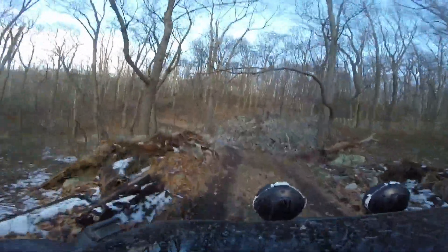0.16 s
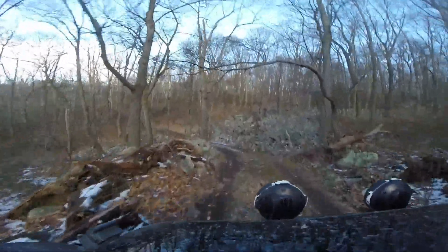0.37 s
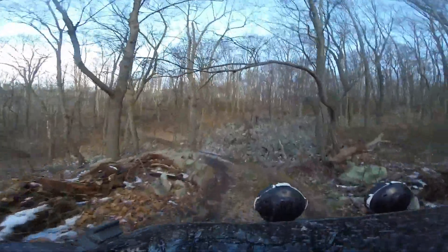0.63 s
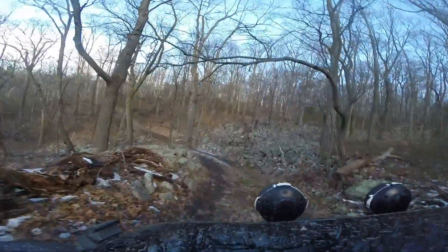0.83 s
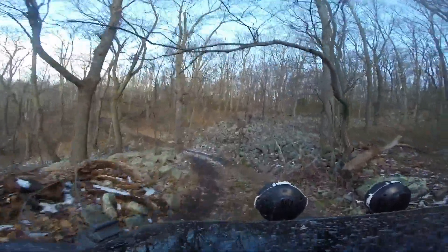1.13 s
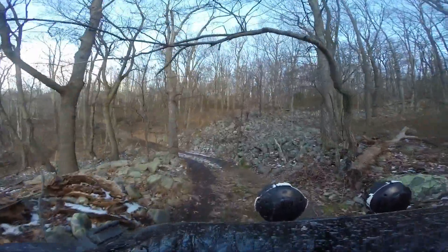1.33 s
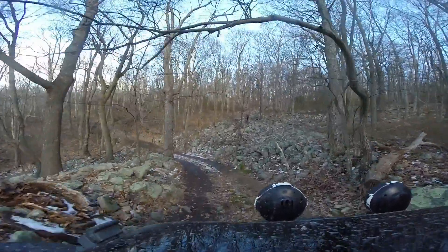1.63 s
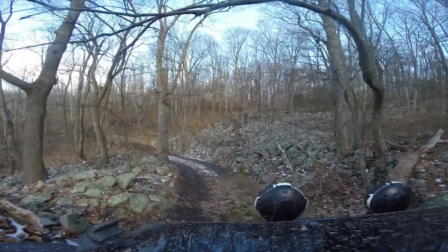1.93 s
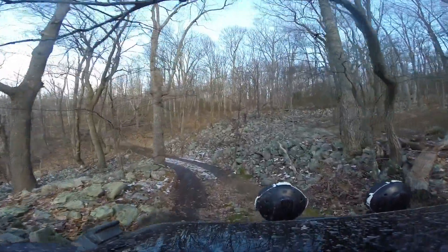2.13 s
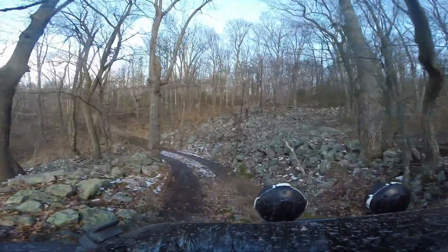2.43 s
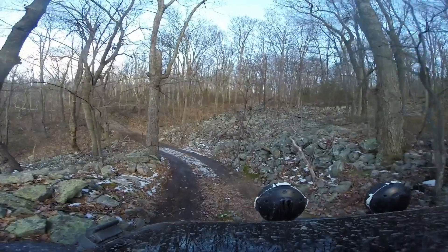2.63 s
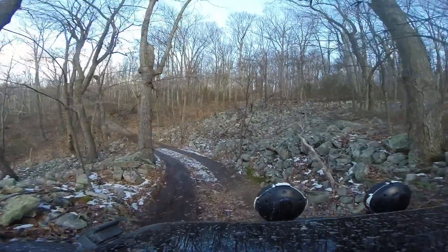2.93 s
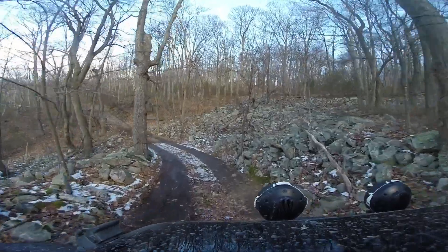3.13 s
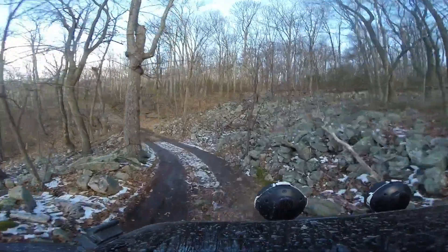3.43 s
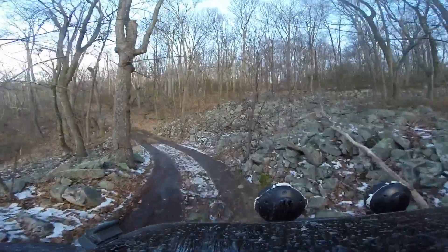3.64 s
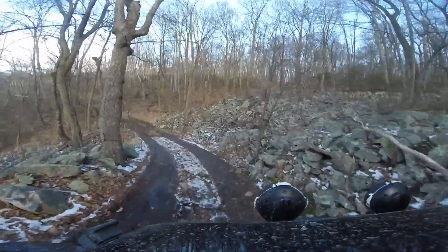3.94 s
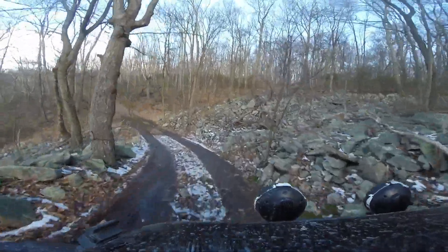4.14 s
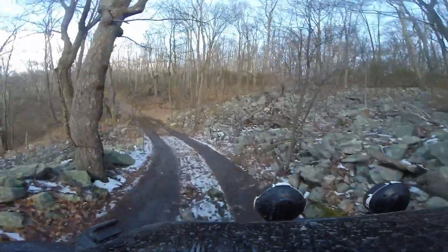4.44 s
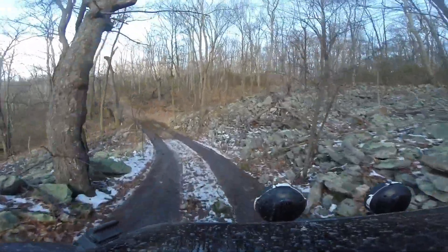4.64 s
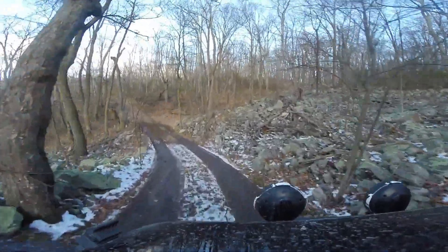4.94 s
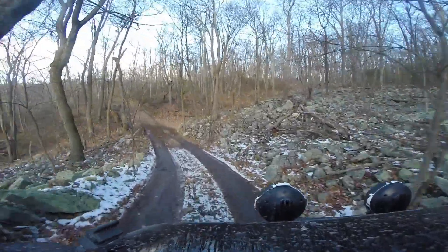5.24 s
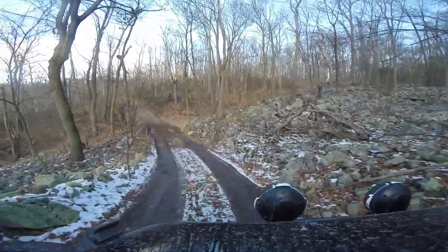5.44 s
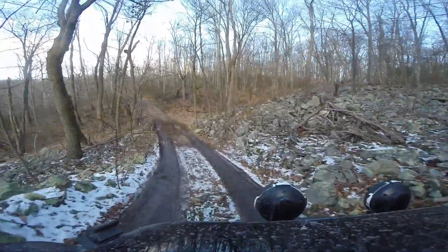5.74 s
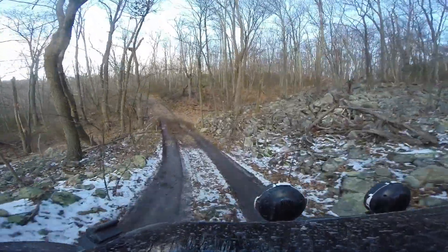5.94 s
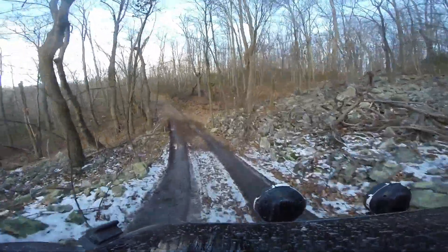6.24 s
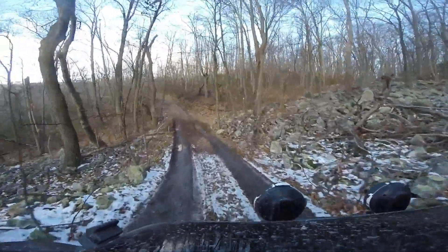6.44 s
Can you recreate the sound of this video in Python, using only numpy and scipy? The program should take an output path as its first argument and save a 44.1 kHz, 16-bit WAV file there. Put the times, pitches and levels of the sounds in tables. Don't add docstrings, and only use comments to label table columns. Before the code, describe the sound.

A low, boomy engine inside a vehicle cab, close and dry. First rough ground: axle thumps, knocking stones, twig scrapes and a loose fitting clattering rapidly. The ride calms, the engine swells and holds for over a second, then falls back. Rattling resumes in quick regular ticks, strongest around four and a half seconds, over muffled tyre crunch, floor thuds and faint leaf crackle to the end.

```python
import sys
import numpy as np
from scipy import signal
from scipy.io import wavfile

SR = 44100
rng = np.random.default_rng(int(sys.argv[2]) if len(sys.argv) > 2 else 0)


def invert_db(level):
    return 10 ** (np.asarray(level, dtype=float) / 20)


def wav_record(signal):
    frames = np.transpose(np.atleast_2d(signal))
    bounded = np.clip(frames, -1, 1)
    quanta = np.round(bounded * 32767).astype(np.int16)
    wavfile.write(sys.argv[1], SR, quanta)


N = 290178


def rms_one(x):
    return x / np.sqrt(np.mean(x ** 2) + 1e-20)


def in_time(rows):
    s, *columns = np.transpose(rows)
    return [np.interp(np.arange(N) / SR, s, column) for column in columns]


def drift(rate_hz):
    pole = np.exp(-80 * np.pi * rate_hz / SR)
    slow = signal.lfilter([1], [1, -2 * pole, pole * pole], rng.standard_normal(N // 40 + 2002))
    slow = slow[2000:]
    return np.interp(np.arange(N) / 40, np.arange(len(slow)), rms_one(slow))


def resonate(x, hz, width_hz):
    pole = np.exp(-np.pi * width_hz / SR)
    zeros = (1 - pole * pole) / 2 * np.array([1, 0, -1])
    poles = [1, -2 * pole * np.cos(2 * np.pi * hz / SR), pole * pole]
    return signal.lfilter(zeros, poles, x + 1e-18)


def resonate_twice(x, hz, width_hz, second_width_hz):
    return rms_one(resonate(resonate(x, hz, width_hz), hz, second_width_hz))


def filtered(x, order, hz, kind="low"):
    return signal.sosfilt(signal.butter(order, hz, kind, fs=SR, output="sos"), x)


def bank(source, spectrum, patchy_db, patch_rate):
    hz, db = np.transpose(spectrum)
    octaves = np.log2(min(hz[-1], SR * .44) / hz[0])
    edges = hz[0] * 2 ** np.arange(0, octaves, 1 / 3)
    out = 0
    for k, (low, high) in enumerate(zip(edges, edges[1:])):
        band = filtered(source[k % 2], 2, [low, high], "band")
        band_db = np.interp(np.log(low * high) / 2, np.log(hz), db)
        out = out + band * invert_db(band_db + patchy_db * drift(patch_rate))
    return rms_one(out)


def grains(per_s, spread_db, hiss):
    size = invert_db(spread_db * np.minimum(rng.exponential(1, (2, N)), 5)) * rng.standard_normal((2, N))
    clicks = size * (rng.random((2, N)) < per_s / SR)
    return rms_one(clicks) + hiss * rng.standard_normal((2, N))


def add_at(out, s, sound):
    at = round(s * SR)
    out[at:at + len(sound)] += sound[:N - at]


def exhaust(hz, turns, load_db):
    # multiple of the firing rate, level in dB.
    orders = [(.5, -38), (1, -24), (2, -30), (3, -32), (4, -32), (5, -39), (6, -41), (7, -56)]
    # frequency in Hz, width in Hz, gain in dB.
    cab_modes = [(118.1, 22.4, 20), (183.5, 14, -0.5), (290, 32, 9.5), (361, 11, 3)]
    out = 0
    for order, db in orders:
        boom = 1
        for mode_hz, width_hz, top_db in cab_modes:
            detuning = 2 * (order * hz - mode_hz) / width_hz
            boom = boom + invert_db(top_db) / np.sqrt(1 + detuning ** 6)
        wobble = invert_db(db + (.4 + .2 * order) * drift(5.0))
        phase = 2 * np.pi * (order * turns + rng.random()) + .04 * order * drift(8.0)
        out = out + boom * wobble * np.sin(phase)
    return np.sqrt(2) * out * invert_db(load_db)


def clatter(turns, level_db):
    # frequency in Hz, level in dB per Hz.
    spectrum = [(1100, -0.5), (1500, -4), (2000, -4.5), (2500, -5), (3300, -10.5), (4200, -13), (5000, -23),
                (5800, -22), (7800, -36), (9000, -47), (11500, -41.5), (13000, -58)]
    # frequency in Hz, width in Hz, level in dB.
    casing = [(1655, 230, -7.5), (2332, 130, -11), (4980, 270, -20), (7720, 1400, -21.5),
              (11200, 2400, -26.5)]
    source = grains(per_s=1800.0, spread_db=-1.0, hiss=3.0)
    noise = bank(source, spectrum, patchy_db=1.56, patch_rate=12.0)
    white = rng.standard_normal(N)
    for hz, width_hz, db in casing:
        noise = noise + invert_db(db) * resonate_twice(white, hz, width_hz, width_hz)
    return invert_db(level_db) * rms_one(noise * (1 + 0.14 * np.cos(2 * np.pi * turns)))


def body(shake_db, thud_db):
    # frequency in Hz, width in Hz, level in dB.
    modes = [(17.4, 4.5, 1.5), (36.2, 14.9, 2), (55.6, 18, -6.5)]
    # frequency in Hz, level in dB per Hz.
    spectrum = [(45, -33), (65, -15.5), (92, -5.5), (122, 2), (160, -5), (220, -12), (300, -8.5)]
    white = rng.standard_normal((3, N))
    shake = sum(invert_db(db) * resonate_twice(white[2], hz, width_hz, 2.3 * width_hz)
                for hz, width_hz, db in modes)
    lumps = invert_db(thud_db + 1.77 * drift(11.0))
    thud = lumps * bank(white, spectrum, patchy_db=0.8, patch_rate=13.0)
    return invert_db(shake_db) * rms_one(shake) + thud


def tyres(crunch_db):
    # frequency in Hz, level in dB per Hz.
    spectrum = [(120, -18.5), (200, -0.5), (320, -2.5), (460, -0.5), (620, -5), (800, -3.5), (1050, -12.5),
                (1300, -20), (1700, -28.5)]
    lumps = invert_db(crunch_db + 0.64 * drift(38.0) + 0.61 * drift(10.3))
    source = grains(per_s=900.0, spread_db=0.5, hiss=1.24)
    grit = bank(source, spectrum, patchy_db=1.5, patch_rate=17.4)
    grit = grit + 0.51 * resonate(grit, 1014.0, 96.0)
    return lumps * filtered(grit, 6, 1120.0)


def leaves():
    # frequency in Hz, level in dB per Hz.
    spectrum = [(4000, -20), (6000, 0), (8000, -9.5), (11500, -11.5), (13500, -12), (15000, -19),
                (16000, -30)]
    # middle in seconds, length in seconds, extra level in dB.
    drifts = [
        (0.05, .3, 4),
        (1.013, 0.16, 2.5),
        (2.702, 0.69, 1.5),
        (3.65, 0.27, 1.5),
        (4.36, 0.12, -1),
        (4.967, .4, 2.5),
        (5.857, 0.65, 7.5),
        (6.555, 0.28, 3),
    ]
    t = np.arange(N) / SR
    litter_db = -68.5
    depth_db = litter_db + sum(db * np.exp(-(2 * (t - s) / length) ** 2) for s, length, db in drifts)
    clumps = invert_db(depth_db - 2.5 + 2.0 * drift(20.0))
    source = grains(per_s=1200.0, spread_db=-0.5, hiss=1.0)
    return clumps * bank(source, spectrum, patchy_db=1.5, patch_rate=15.0)


def twigs():
    # start in seconds, length in seconds, level in dB, centre in Hz, width in Hz.
    scrapes = [(0.228, 0.03, -48, 6800, 6800), (0.026, 0.053, -54, 2900, 1800),
               (0.26, 0.077, -49, 2100, 1300), (0.26, 0.049, -44.5, 1900, 3930),
               (0.276, 0.016, -63, 11000, 500), (.268, .022, -64, 6500, 4000),
               (0.786, 0.032, -37, 2100, 590), (0.69, 0.036, -42, 1800, 2100),
               (5.824, 0.026, -49.5, 1900, 1000), (3.62, 0.037, -62, 7800, 700),
               (5.683, .012, -73, 11000, 2500), (5.786, .006, -62, 11410, 3500),
               (5.862, 0.0092, -62, 8000, 1200), (5.897, .006, -64, 7960, 1190),
               (5.91, .008, -65, 8000, 1500), (6.227, 0.0089, -65, 8100, 1005)]
    out, t = np.zeros(N), np.arange(3000) / SR
    for s, length, db, hz, width_hz in scrapes:
        shape = np.exp(-(2 * t / length - 1) ** 4)
        noise = resonate_twice(rng.standard_normal(3000), hz, width_hz, width_hz)
        add_at(out, s, invert_db(db) * shape * noise)
    return out


def contacts():
    # first and last contact in seconds,
    # first and last level in dB, rebound level in dB.
    hops = [(0.0312, .0314, -23.5, -26, 3.5), (0.0898, .0894, -15, -21, -10), (0.1494, .2104, -21, -24, -1),
            (0.3313, .4535, -21.5, -18.5, -0.5), (0.517, .5174, -10, -11, -11.5),
            (.582, .5821, -12, -11, -13), (0.639, .6942, -20, -29, -2), (0.8394, .8401, -25.5, -25, 0),
            (1.114, 1.1778, -41.5, -37, -10), (1.2249, 1.3991, -33.5, -30.5, -27),
            (3.355, 3.3554, -37, -33, -27), (3.4115, 3.412, -27.5, -29, 7.5),
            (3.476, 3.4762, -25.5, -27, 3.5), (3.5361, 3.5963, -28, -29, 3), (3.649, 3.8291, -33, -30, 2.5),
            (3.8861, 3.8856, -22.5, -26, -2.5), (3.949, 4.0129, -24.5, -27, 0),
            (4.069, 4.1834, -27.5, -25, -10), (4.252, 4.3815, -23, -34, -3),
            (4.4399, 4.4404, -17, -17, -18), (4.5738, 4.5732, -26, -27.5, -1),
            (4.6324, 4.6905, -28.5, -33, -15), (4.75, 4.7503, -31.5, -33, 3.5),
            (4.8215, 4.8227, -24, -23, -21), (5.366, 5.3674, -43, -37, -15),
            (5.4296, 5.496, -32.5, -32.5, -4), (5.56, 5.5606, -36, -35, 5),
            (5.954, 6.1903, -30.5, -35.5, -10), (6.248, 6.3063, -17.5, -15.5, -22),
            (6.363, 6.4865, -22.5, -32, 0.5), (6.549, 6.5491, -35, -36, -15)]
    # start in seconds, peak in dB, brightness in dB.
    strays = [(.109, -26, -15), (0.1175, -34, -7), (.267, -35, 2), (0.272, -24, -9), (0.1964, -24, -21),
              (0.2533, -20, -18), (0.2965, -20.5, -6), (0.3099, -19, -10), (0.362, -28, -8),
              (0.3669, -23, -10), (.4239, -37, 0), (0.669, -27, -3), (0.7104, -35, -4), (0.88, -32.5, -31),
              (0.9706, -32, 3), (0.992, -27, -12), (2.306, -30.5, -10), (2.622, -33, 6.5),
              (4.0946, -30, -14), (4.15, -29, -5), (4.2117, -26.5, -10), (4.274, -24.5, -12),
              (4.3384, -22, -10), (4.4033, -31, -23), (4.4556, -32, -11), (4.4633, -26, -14),
              (4.502, -29, -11), (4.5177, -15.5, -2), (4.78, -23, -15), (4.8367, -26, -12),
              (5.756, -34, -2), (6.233, -35, -10)]
    # start in seconds, peak in dB, brightness in dB.
    grazes = [(.0565, -36, -12), (.1775, -35, -17), (.4777, -36, -19), (.483, -38, -17), (.4925, -36, -19),
              (.5615, -38, -19), (0.6075, -34.5, -16), (.6227, -33, -8), (1.186, -33, -14),
              (1.2622, -35.5, -16), (1.3483, -35, -3), (3.366, -38, -11), (3.522, -43, 5),
              (3.675, -34, -11), (3.794, -48, 4), (3.934, -43, -4), (3.977, -40, -11), (4.3066, -29, -14),
              (4.3968, -34, -14), (4.6018, -35, -11), (4.6625, -35, -14), (4.886, -38, -19),
              (4.9034, -40, -9), (5.3956, -35, -20), (5.704, -36, -6), (5.8639, -39, 1), (5.9713, -36, -11),
              (6.162, -38, -18), (6.319, -37, -14), (6.39, -40, -14)]
    hop_s, rebound_s = .0605, .004
    runs = []
    for first, last, first_db, last_db, rebound_db in hops:
        count = round((last - first) / hop_s) + 1
        runs.append(np.linspace((first, first_db, rebound_db), (last, last_db, rebound_db), count))
    s, db, rebound_db = np.concatenate(runs).T
    chance = rng.standard_normal((5, len(s)))
    bright_db = 2.5 + 0.76 * np.clip(-31 - db, -5, 5) + 0.43 * chance[1]
    hits = s, db + .5 * chance[0], bright_db
    slowing_db = np.clip(-29.5 - db, 0, 6) + .6 * chance[2]
    rebounds = s + rebound_s * invert_db(slowing_db), db + rebound_db + .5 * chance[3], -7 + 2 * chance[4]
    return np.hstack([hits, rebounds, np.transpose(strays), np.transpose(grazes)])


def rattle():
    # frequency in Hz, level in dB, T60 in seconds.
    modes = [(1750, -17, .015), (2100, -10, .018), (2500, -5, .02), (2950, -2, .015), (3300, -4, .013),
             (3620, -2, .013), (3900, -4, .012), (4280, -3, .012), (4650, -4, .012), (5010, -2, .012),
             (5350, -5, .011), (5650, 0, .011), (6050, -5, .009), (6500, -12, .008), (7400, -27, .008),
             (8300, -30, .007), (9500, -35, .005), (11300, -32, .005), (13000, -35, .004),
             (14600, -33, .004)]
    s, peak_db, bright_db = contacts()
    hz, db, t60 = np.transpose(modes)
    t = np.arange(1000) / SR
    tilt = 1.1 * np.clip(np.log2(hz / 3700), -.55, .6)
    chance = rng.standard_normal((len(s), len(hz), 2))
    strength = invert_db(db + 1.7 * chance[..., 0] + np.outer(bright_db, tilt))
    strength = strength * invert_db(0.37 * np.outer(peak_db + 51.5, hz > 7000))
    phase = 2 * np.pi * np.outer(hz, t - .0006)
    decay = invert_db(-60 * t / np.maximum(t60, .002)[:, None])
    ticks = (strength * np.cos(1.31 * chance[..., 1])) @ (decay * np.cos(phase))
    ticks = ticks + (strength * np.sin(1.68 * chance[..., 1])) @ (decay * np.sin(phase))
    rise = np.sin(np.pi / 2 * np.minimum(t / .0008, 1)) ** 2
    snap = np.clip((peak_db[:, None] + 32) / 16, .1, 1.3)
    ticks = ticks * rise * (.6 + snap * np.exp(-t / .0012))
    ticks = ticks * (invert_db(peak_db) / np.abs(ticks).max(axis=1))[:, None]
    crack = filtered(rng.standard_normal(ticks.shape) * np.exp(-t / .0015), 4, 8000.0, "high")
    crack_db = -54 + 1.8 * (peak_db + 20) + 4.0 * rng.standard_normal(len(s))
    ticks = ticks + crack * invert_db(crack_db)[:, None]
    out = np.zeros(N + len(t))
    np.add.at(out, np.round(s * SR).astype(int)[:, None] + np.arange(len(t)), ticks)
    return out[:N]


def thumps():
    # start in seconds, peak in dB, pitch in Hz.
    drops = [(0.038, -9, 20.4), (0.16, -18.5, 30), (3.959, -16.5, 45.4), (4.071, -16.5, 34.8),
             (4.702, -8, 29), (5.44, -17.5, 40.5), (0.112, -14, 188), (0.246, -35, 199), (0.791, -17, 193),
             (5.31, -19.5, 176), (5.41, -12.5, 183.6), (6.461, -13, 39.04), (0.46, -30, 130),
             (0.678, -18, 153), (1.331, -22.5, 144), (3.228, -56, 91.5), (4.047, -21, 61),
             (4.589, -38, 101), (5.023, -20, 69.9), (5.204, -14, 80), (5.491, -14, 135), (5.588, -12, 159),
             (5.825, -31, 109.5), (6.182, -24, 90.2), (3.929, -14, 142), (4.251, -15, 126),
             (5.098, -15.5, 197.5), (5.701, -22, 188), (5.9, -24, 170), (1.149, -26, 115),
             (3.298, -28, 130)]
    out, t = np.zeros(N), np.arange(8000) / SR
    for s, db, hz in drops:
        cycles = t * hz / 0.66
        push = cycles * np.exp(1 - cycles)
        add_at(out, s, invert_db(db - 3.0) * push * np.sin(2 * np.pi * hz * t))
    return out


def knocks():
    # start in seconds, peak in dB, pitch in Hz, length in seconds.
    stones = [(0.043, -9.5, 620, 0.019), (0.114, -11.5, 835, 0.011), (0.131, -17, 586, 0.0097),
              (.81, -13, 513, 0.018), (0.193, -9.5, 487, 0.0062), (0.234, -11, 630, 0.0088),
              (.249, -12, 680, 0.022), (0.359, -15, 715, 0.014), (0.587, -41, 554, 0.012),
              (0.786, -9, 765, 0.014), (0.795, -7.5, 452, 0.019), (0.922, -17, 454, 0.015),
              (1.114, -22, 352, 0.016), (1.225, -28, 590, 0.0087), (1.276, -34, 523, 0.012),
              (1.606, -22, 604, 0.01), (1.626, -21.5, 826, 0.064), (1.933, -15.5, 550, 0.009),
              (2.017, -14.5, 468, .012), (3.247, -22, 300, 0.012), (3.581, -19.5, 811, 0.011),
              (3.677, -20, 278, 0.0087), (3.79, -21, 406, 0.037), (3.871, -18, 380, 0.0096),
              (4.029, -17, 480, 0.012), (4.378, -32, 440, 0.011), (4.113, -24, 290, .012),
              (5.106, -27, 240, 0.0087), (5.47, -20, 270, 0.01), (5.598, -19, 300, 0.016),
              (5.672, -16.5, 339, 0.011), (5.382, -14.5, 626, 0.025), (5.512, -22, 710, 0.0051),
              (5.859, -15, 486, 0.0095), (5.93, -16, 467, 0.011), (6.082, -13.5, 520, 0.013),
              (6.247, -16, 331, 0.011), (6.15, -18, 775, 0.017), (6.435, -17.5, 442, 0.01),
              (6.486, -15.5, 643, 0.024), (0.714, -14.5, 670, .01), (2.158, -19, 519, .01),
              (2.239, -15, 540, .01), (2.273, -13.5, 541, 0.0086), (2.477, -20, 350, .012),
              (2.813, -16, 441, .012), (5.261, -18, 527, 0.012), (5.893, -18, 589, .01),
              (4.322, -33, 696, 0.0088), (5.302, -22, 940, 0.018)]
    out, t = np.zeros(N), np.arange(6000) / SR
    for s, db, hz, length in stones:
        grinding = rng.standard_normal(6000) * np.minimum(t / .0015, 1)
        grinding = grinding * np.exp(-(t / max(length, .003)) ** 2)
        blow = 1.3 * np.exp(-((t - .001) * hz * 8) ** 2)
        burst = resonate(grinding + blow, hz, 120.0)
        burst = filtered(burst + 0.067 * resonate(burst, 520.0, 870.0), 4, 1200.0)
        add_at(out, s, invert_db(db - 5.0) * burst / np.abs(burst).max())
    return out


def squeaks():
    # start in seconds, length in seconds, pitch in Hz, level in dB, second partial in dB.
    slips = [(0.147, 0.0076, 2370, -41, -25), (0.196, 0.008, 2450, -38, -23),
             (0.257, 0.009, 2500, -38, -27), (0.32, .008, 2430, -42, -21),
             (0.771, 0.0094, 2500, -39.5, -14), (0.916, 0.04, 2390, -51, -7),
             (0.958, 0.049, 2370, -51, 1.5), (.977, .009, 2540, -39, -20), (0.98, 0.035, 2366, -52, -4),
             (1.03, 0.051, 2440, -65, -5), (1.169, .009, 2480, -39, -25), (4.122, 0.0041, 2320, -35.5, -25),
             (5.181, 0.0069, 2460, -43.5, -33), (6.139, .009, 2520, -46, -25),
             (1.344, 0.073, 3760, -58, -12), (1.103, 0.042, 2750, -50, -14), (1.355, .04, 2560, -58, -4),
             (4.178, 0.0071, 2350, -36, -19), (4.235, 0.0086, 2380, -37.5, -26),
             (4.293, .01, 2453, -42, -29), (3.287, 0.022, 3640, -44.5, -14), (3.299, 0.035, 3680, -50, -12),
             (4.358, 0.032, 3530, -43, -22), (5.05, 0.031, 2790, -49, -31), (0.844, 0.027, 2290, -50, -20),
             (1.004, 0.069, 2380, -62, -6), (1.12, 0.028, 2800, -61, -20), (5.081, .04, 2765, -62, -25),
             (5.185, .03, 2430, -60, -25)]
    out, waver, throb = np.zeros(N), drift(130.0), drift(150.0)
    for s, length, hz, db, second_db in slips:
        span = slice(round(s * SR), round((s + length) * SR))
        phase = 2 * np.pi * np.cumsum(hz * (1 + .013 * waver[span])) / SR
        shape = np.sin(np.pi * np.linspace(0, 1, len(phase)) ** .6) * invert_db(db + 4 * throb[span])
        tone = np.sin(phase) + invert_db(second_db) * np.sin(2 * phase)
        if hz < 3000:
            tone = tone + invert_db(second_db - 12) * np.sin(3 * phase)
        out[span] += shape * tone
    return out


def scene():
    # time in seconds, firing rate in Hz.
    firing = [(0.0, 42.26), (0.4, 45.34), (0.75, 41.84), (1.41, 36.17), (1.6, 40.9), (1.72, 45.8),
              (1.84, 51.83), (2.11, 57.04), (2.31, 58.25), (2.57, 59.2), (2.72, 60.36), (3.05, 60),
              (3.15, 58.9), (3.41, 43.3), (4.0, 42.34), (4.45, 38.97), (4.97, 36.7), (6.58, 36.4)]
    # time in seconds, load in dB.
    throttle = [(0, -16.5), (.3, -20), (1.11, -21.5), (1.25, -34.5), (1.55, -16.5), (1.72, -7.5),
                (1.78, -10.5), (1.9, -13), (2.1, -9.5), (2.3, -5), (2.9, -9), (3.05, -7.5), (3.13, -23),
                (3.22, -26.5), (3.4, -25.5), (4.3, -21), (4.45, -30.5), (6.58, -28.5)]
    # time in seconds, suspension travel in dB, grit under the tread in dB.
    trail = [(0.0, -16, -26), (0.11, -26, -28.5), (0.14, -24.5, -27), (0.38, -29, -29), (0.58, -26, -33.5),
             (0.78, -23.5, -31), (1.5, -33.5, -34.5), (2.75, -26, -30), (3.3, -28.5, -34.5),
             (3.75, -22, -33), (4.1, -21.5, -33), (4.35, -25.5, -35), (4.71, -22, -33.5), (5.0, -22, -33.5),
             (5.43, -21, -32.5), (6.21, -26, -32), (6.47, -22.5, -32.5), (6.58, -32, -31.5)]
    hz, = in_time(firing)
    turns = np.cumsum(hz) / SR
    load_db, = in_time(throttle)
    travel_db, grit_db = in_time(trail)
    load = load_db - load_db.mean()
    travel, grit = travel_db - travel_db.mean(), grit_db - grit_db.mean()
    clatter_db = -49.5 + 0.092 * load + 0.68 * grit
    thud_db = -32 + 0.43 * travel + 0.19 * grit
    engine = exhaust(hz, turns, load_db) + clatter(turns, clatter_db)
    ground = body(travel_db, thud_db) + tyres(grit_db) + leaves() + twigs() + thumps() + knocks()
    return (engine + ground + rattle() + squeaks())[None]


def roll_off(x):
    return signal.sosfilt(signal.butter(12, 15550, fs=SR, output="sos"), x)


def record(dry):
    heard = filtered(dry, 1, 12.0, "high")
    heard = filtered(heard, 3, 13600.0)
    return roll_off(heard)


dry = scene()
out = record(dry)
wav_record(out)
```